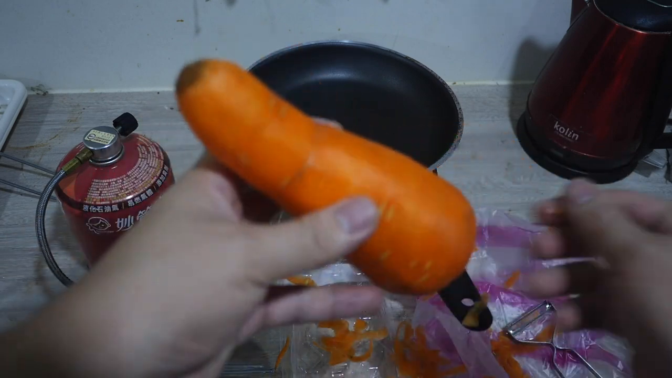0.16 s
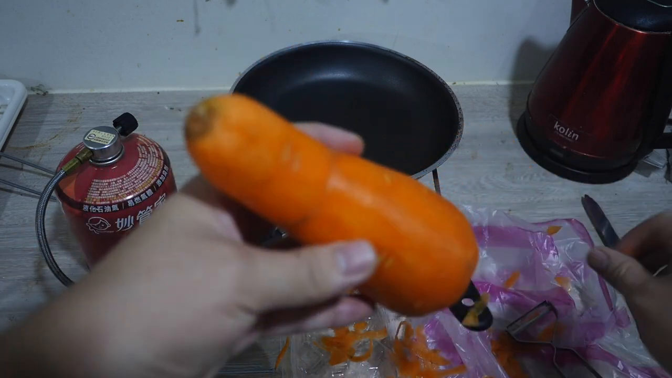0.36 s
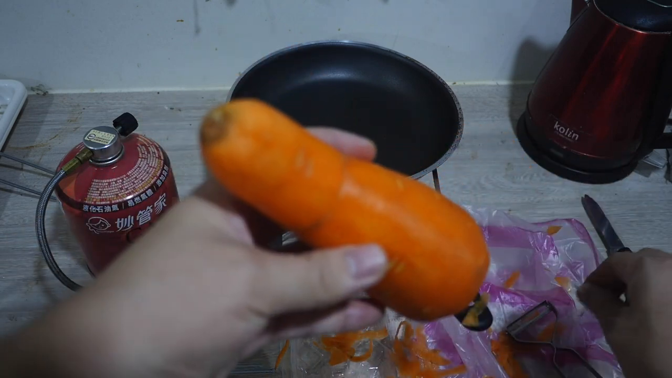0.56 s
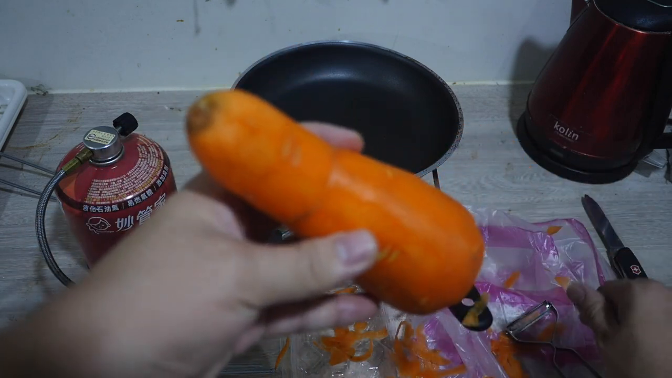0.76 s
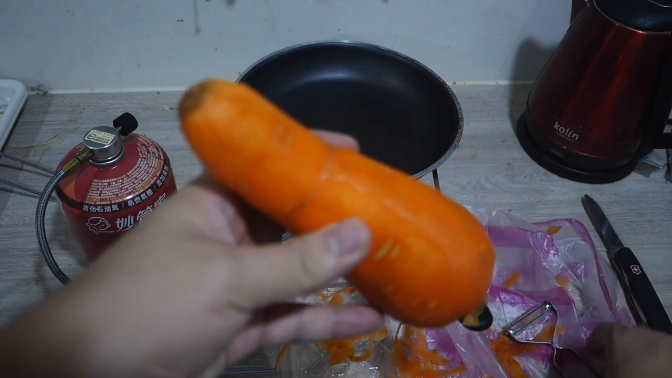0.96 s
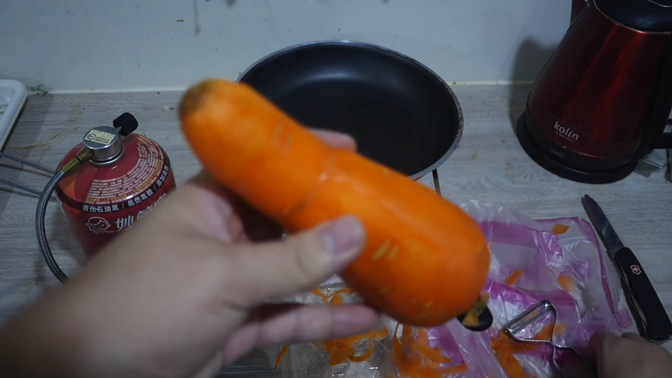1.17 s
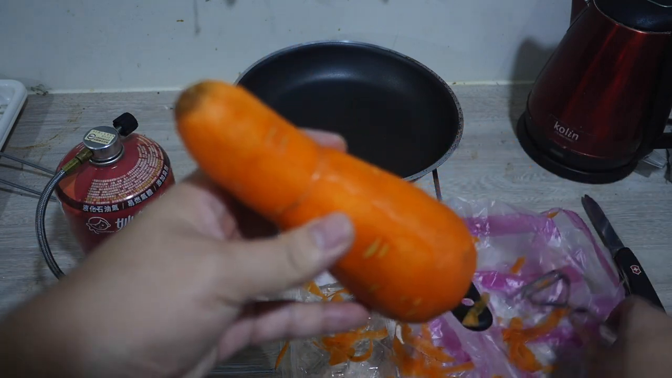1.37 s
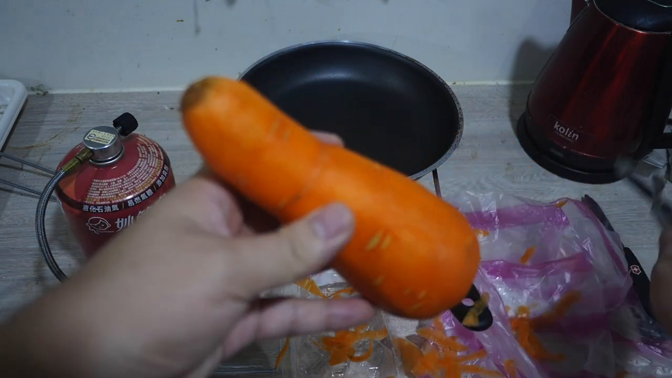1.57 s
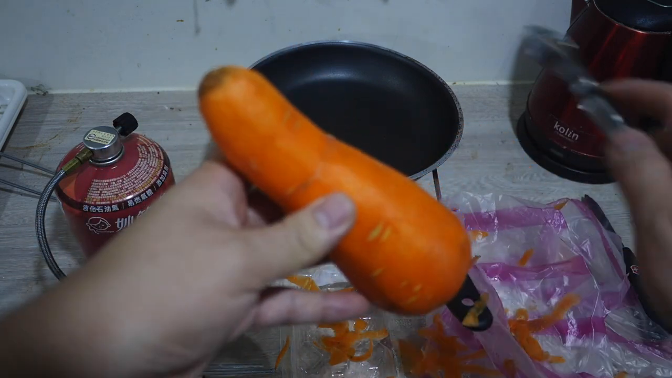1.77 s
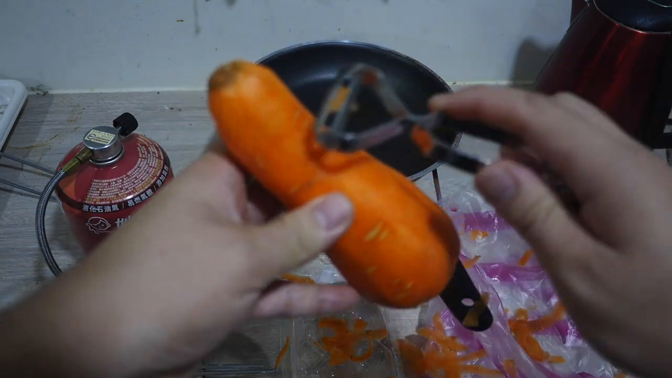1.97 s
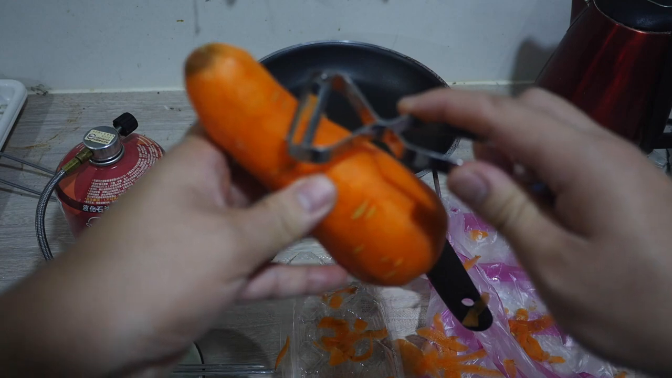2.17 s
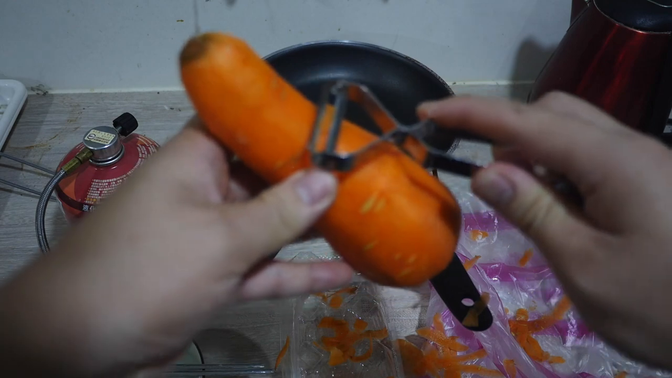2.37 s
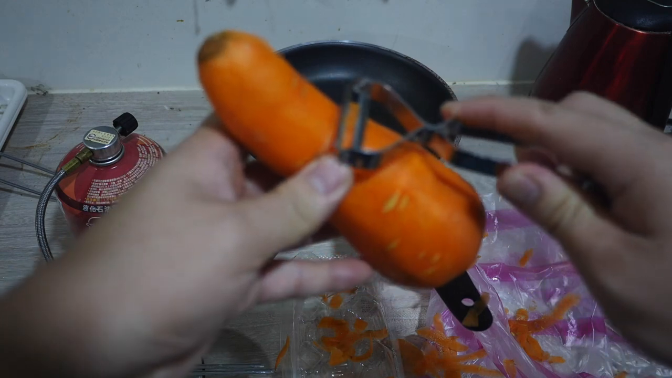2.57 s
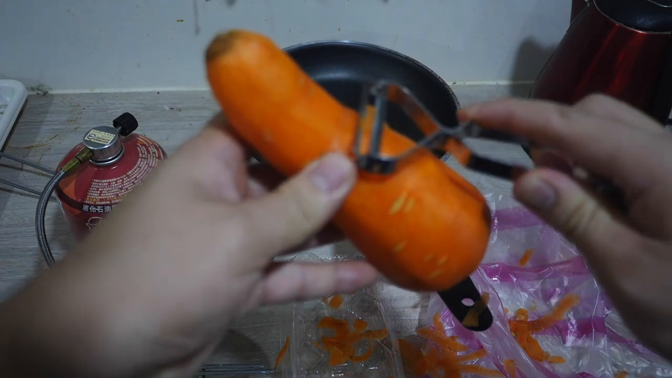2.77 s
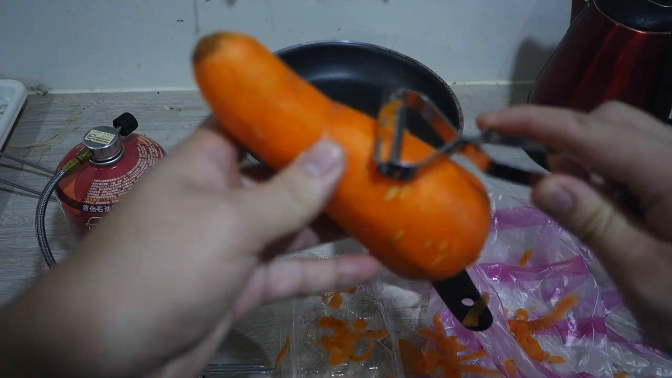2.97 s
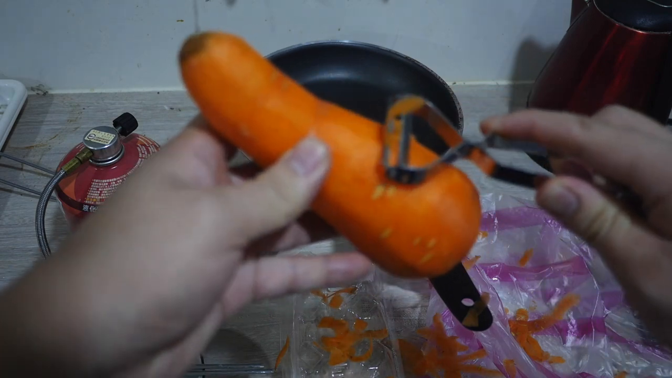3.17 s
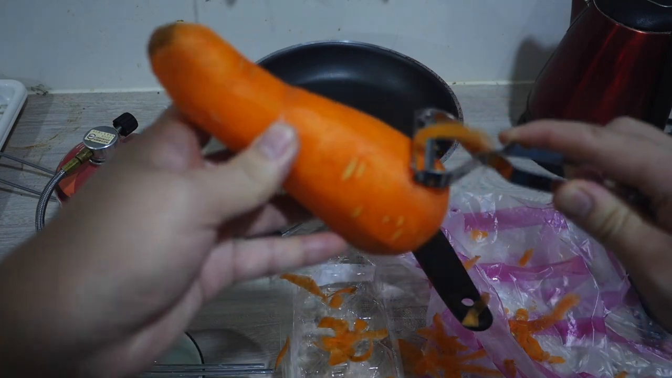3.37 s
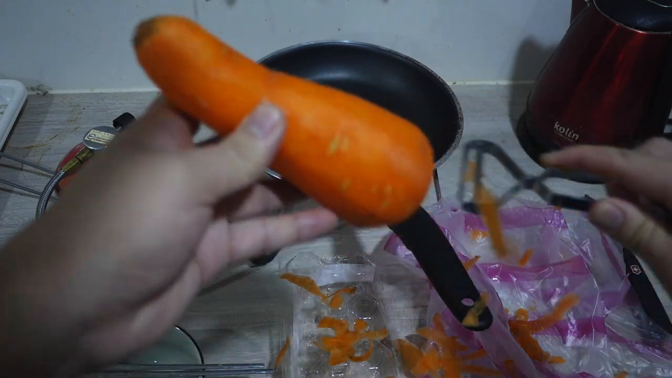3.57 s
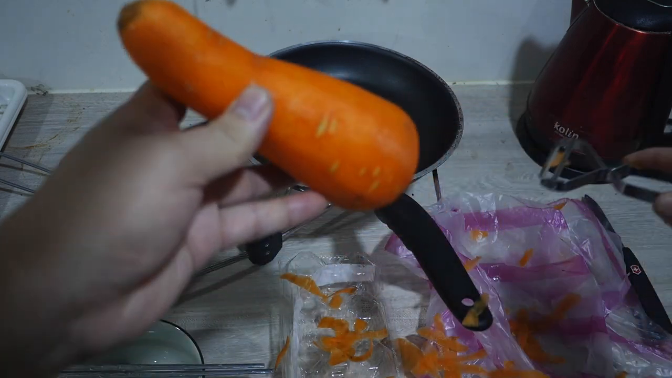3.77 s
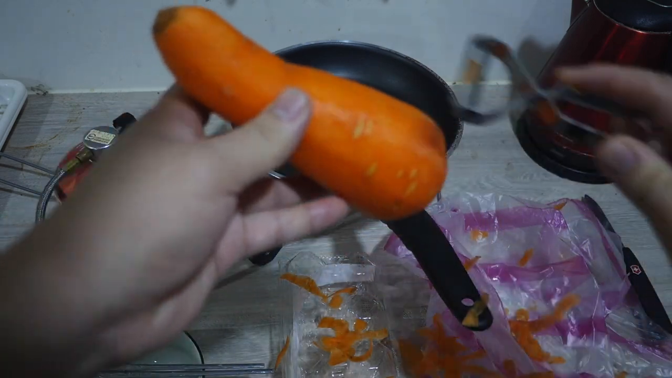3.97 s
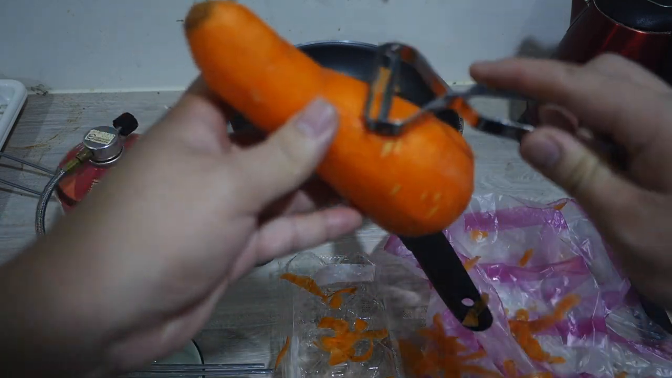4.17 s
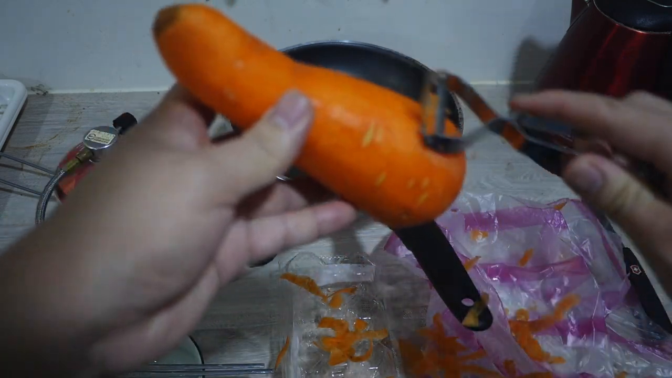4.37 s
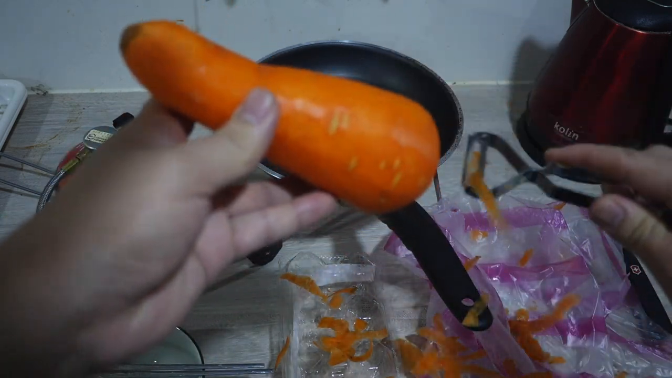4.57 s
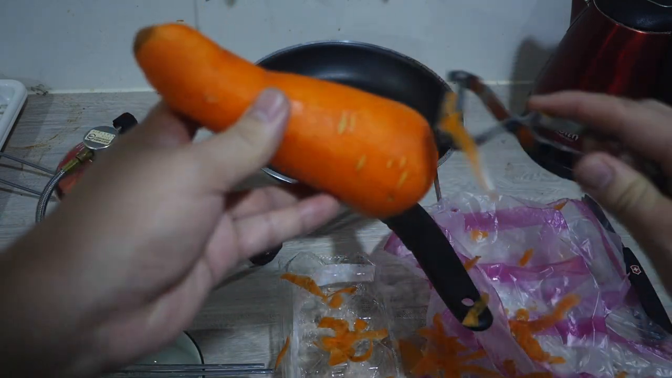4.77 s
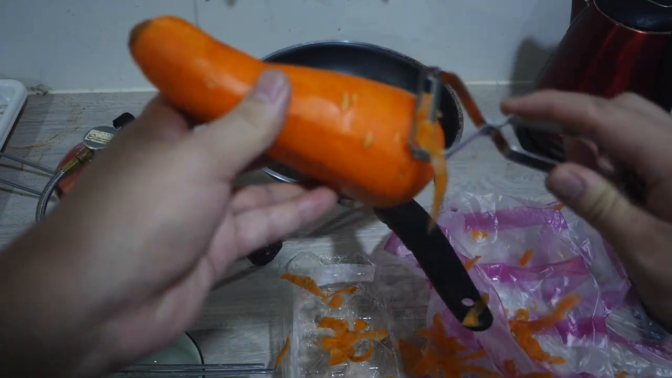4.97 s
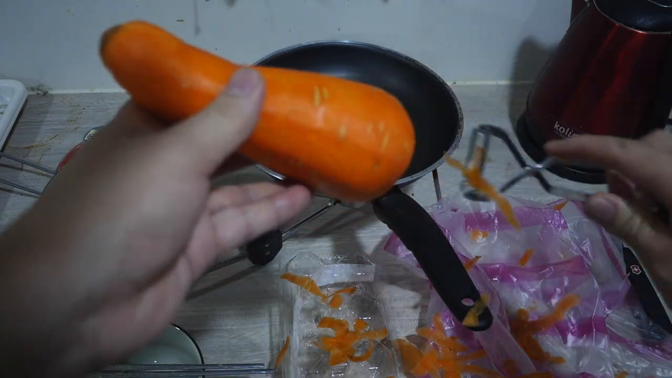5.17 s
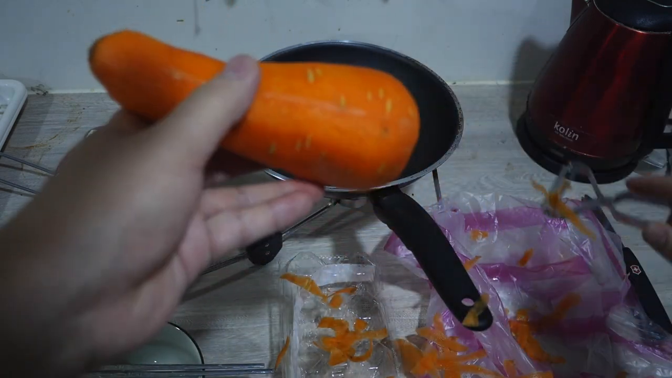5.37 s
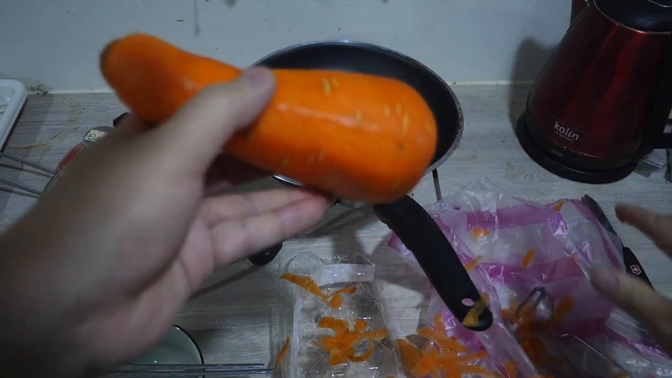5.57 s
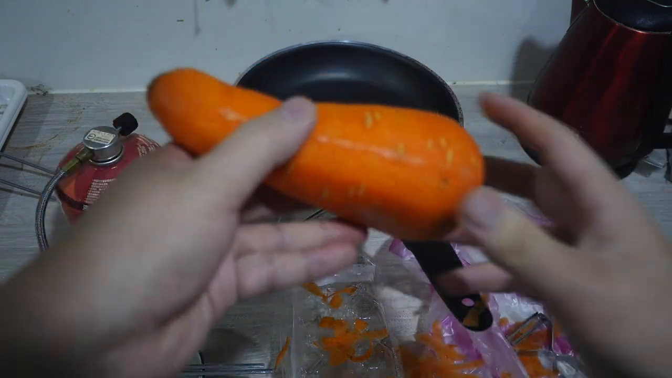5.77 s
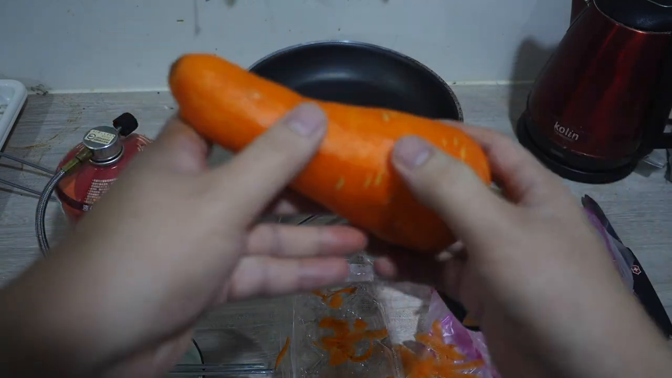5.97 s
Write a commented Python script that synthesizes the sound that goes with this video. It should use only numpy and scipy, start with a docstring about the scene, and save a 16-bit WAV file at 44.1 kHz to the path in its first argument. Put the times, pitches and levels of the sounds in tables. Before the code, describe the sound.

Over a faint fan hum, crinkling plastic gives way to thin raspy carrot peeling and steel clicks, ending in one hard, loud knock on the counter.

```python
"""Small hard kitchen, fan humming: a steel swivel peeler is lifted off a crinkly plastic bag, shaves a raw carrot in
six strokes and is dropped on the counter, where it knocks and skids.
Bag and carrot are filtered grit (uneven impulses over noise); the loose blade's clicks and jingles and the counter
are banks of modes; the skid is filtered noise; a decaying noise tail makes the reverberation."""
import sys
import numpy as np
from scipy import signal
from scipy.fft import rfft, irfft, next_fast_len
from scipy.io import wavfile
from scipy.ndimage import map_coordinates

SR = 44100
rng = np.random.default_rng(int(sys.argv[2]) if len(sys.argv) > 2 else 0)


def to_wav(sig):
    """Store sig (one row per channel, or 1-D mono) as 16-bit WAV at the path in sys.argv[1].

    Samples outside -1..1 are clipped; the rate is SR.
    """
    pcm = np.clip(np.atleast_2d(sig), -1, 1) * 32767
    pcm = np.round(pcm).astype(np.int16)
    wavfile.write(sys.argv[1], SR, pcm.T)  # frames by channels


N = 265041

# modes of the free blade: pitch_hz, mean_level_db, longest_t60_s
BLADE_MODES = [(2600, -9, .04), (2845, -11, .12), (3950, -15, .03), (5520, -8, .08), (5800, -5, .03),
               (6140, -11, .12), (7150, -4, .3), (7750, -15, .2), (10100, -7, .12), (11070, 0, .22),
               (11760, -6, .2), (13120, -8, .12), (14150, -4, .18), (14580, -2, .15)]


def amp(db):
    """Amplitude of a level in dB."""
    return 10 ** (np.asarray(db) / 20)


def unit(x):
    """x scaled to an RMS of 1."""
    return x / np.sqrt(np.mean(x ** 2) + 1e-20)


def along(points, hz):
    """Interpolate (Hz, value) points on a log frequency axis."""
    point_hz, values = np.transpose(points)
    return np.interp(np.log(hz + 1), np.log(point_hz + 1), values)


def wobble(knots_per_s):
    """A smooth random curve through normally distributed knots."""
    knots = rng.standard_normal(int(N * knots_per_s / SR) + 4)
    return map_coordinates(knots, [np.arange(N) * knots_per_s / SR])


def filtered(x, response):
    """x times a complex response of frequency."""
    size = next_fast_len(len(x) + 8192)
    spectrum = rfft(x, size) * response(np.fft.rfftfreq(size, 1 / SR))
    return irfft(spectrum, size)[:len(x)]


def resonances(peaks):
    """Causal response of (Hz, width Hz, dB) peaks, summed with alternating sign."""
    def response(f):
        return sum((-1) ** k * amp(db) * 1j * f * width / (centre ** 2 - f * f + 1j * f * width)
                   for k, (centre, width, db) in enumerate(peaks))
    return response


def grit(rate, spread_db, smooth):
    """Sparse impulses of very uneven size, rate per second, over a share of smooth noise."""
    struck = rng.random(N) < rate / SR
    size = amp(spread_db * np.minimum(rng.exponential(size=N), 3.5))
    hits = struck * size * rng.standard_normal(N)
    return unit(unit(hits) + smooth * rng.standard_normal(N))


def ring(modes, t60_s, scatter_db):
    """One blow: each mode at a new strength, its decay time capped at t60_s."""
    t = np.arange(SR // 5) / SR
    return sum(amp(db + rng.normal(0, scatter_db) - 60 * t / min(t60_s, life_s)) * np.sin(2 * np.pi * hz * t)
               for hz, db, life_s in modes)


def add(track, start_s, peak_db, sound):
    """Lay a sound into the track at start_s, its peak at peak_db."""
    part = track[round(start_s * SR):][:len(sound)]
    part += amp(peak_db) * sound[:len(part)] / np.abs(sound).max()


def swell(rows, rise_s, fall_s):
    """Gain of (start, end, dB, dB) gestures that rise and fall 30 dB in the given times."""
    t = np.arange(N) / SR
    return sum(amp(np.interp(t, [start - 3 * rise_s, start, end, end + 3 * fall_s],
                             [first - 90, first, last, last - 90]))
               for start, end, first, last, *_ in rows)


def kitchen(x):
    """Reverberation: a noise tail in which each frequency dies at its own speed."""
    # hz, t60_s
    decay = [(200, 0.98), (1000, 0.32), (4000, 0.61), (12000, 0.21)]
    hz, t, z = signal.stft(rng.standard_normal(SR // 2), SR, nperseg=256)
    fade = amp(-60 * t / along(decay, hz)[:, None])
    tail = signal.istft(z * fade, SR, nperseg=256)[1]
    delayed = np.pad(x, (150, 0))  # samples
    return signal.fftconvolve(delayed, tail / np.linalg.norm(tail))[:N]


def fan():
    """Broad room tone, and noise in narrow fan and duct resonances whose level wanders."""
    # room tone: hz, density_db_per_hz
    air_curve = [(30, -16), (180, -15), (700, -8), (1100, -6), (2230, -18), (2970, -21), (5130, -26),
                 (8000, -32), (15700, -35)]
    # fan and duct resonances, before the power below: hz, width_hz, level_db
    hum_peaks = [(50.7, 4.8, -8.5), (107, 8.3, -7), (263.1, 6.1, -4.5), (306.7, 22, 1), (390, 890, -10),
                 (518.3, 23.6, 1), (599.7, 7.3, -9), (1180, 20, -47)]
    air_db, hum_db = -67, -57.5
    air = unit(filtered(rng.standard_normal(N), lambda hz: amp(along(air_curve, hz))))
    hum = unit(filtered(rng.standard_normal(N), lambda hz: np.abs(resonances(hum_peaks)(hz)) ** 1.67))
    return amp(air_db) * air + amp(hum_db + 0.57 * wobble(4.1)) * hum


def bag():
    """Clumped crackle of the film, whose dull and bright folds come and go apart, with louder snaps on top."""
    # pushes on the bag: start_s, end_s, start_level_db, end_level_db
    pushes = [(1.068, 1.35, -43, -46), (1.375, 1.425, -40.5, -43), (1.44, 1.47, -47, -43.5),
              (1.495, 1.57, -35, -46.5), (1.62, 1.725, -52, -52), (2.3, 2.32, -62.5, -62.5),
              (3.845, 3.865, -58, -47.5)]
    # plastic film: hz, density_db_per_hz
    film = [(290, -22), (500, -5), (839, -7), (3790, -1), (4910, -6), (5590, -2.5), (15500, -16.5)]
    # single folds that snap: start_s, peak_db
    snaps = [(1.069, -39), (1.1545, -28), (1.285, -29), (1.3727, -28), (1.4894, -27.5), (1.6225, -39.5),
             (1.652, -30.5), (1.68, -33), (1.708, -33), (1.745, -44), (1.7763, -40.5), (1.8017, -35.5),
             (2.0286, -50), (2.0614, -41.5), (2.197, -47.5), (3.0104, -33), (3.8342, -44), (3.8465, -39.5)]
    rise_s, fall_s = .03, 0.024  # over 30 dB

    def crackle():
        return amp(2.4 * wobble(80)) * grit(rate=3600, spread_db=6.0, smooth=1.08)

    def bright(hz):
        return hz ** 2 / (hz ** 2 + 4500 ** 2)

    dull = filtered(crackle(), lambda hz: amp(along(film, hz)) * np.sqrt(1 - bright(hz)))
    crisp = filtered(crackle(), lambda hz: amp(along(film, hz)) * np.sqrt(bright(hz)))
    out = swell(pushes, rise_s, fall_s) * unit(dull + crisp)

    t = np.arange(SR // 20) / SR
    for start_s, peak_db in snaps:
        burst = amp(-60 * t / 0.03) * rng.standard_normal(len(t))
        add(out, start_s, peak_db, filtered(burst, resonances([(3680, 3300, 10.5), (9080, 9700, -7)])))
    return out


def drop():
    """Skid noise and blows on the counter; each contact favours its own pitch and weakens the modes above it."""
    # handle hits the counter: start_s, peak_db (before the last bass cut), contact_pitch_hz
    knocks = [(5.6251, -1, 5200), (5.6270, 5.5, 3440), (5.6435, -12, 790), (5.6598, -3.5, 1890),
              (5.6616, 3, 3000), (5.764, -12.5, 3400), (5.89, -37, 5000), (5.925, -42.5, 3400)]
    # counter modes: pitch_hz, mean_level_db, t60_s
    counter = [(490, -8.5, 0.027), (760, 0, 0.017), (1380, 3.5, 0.0032), (2030, -8.5, 0.0065),
               (2930, 1.5, 0.0032), (3810, 4, 0.0054), (5270, 1.5, 0.0089)]
    skid_s, skid_hold_s, skid_db, skid_sag_db = 5.622, 0.067, -22.5, 3
    skid_rise_s, skid_fall_s = 0.0058, 0.23  # over 30 dB

    def no_bass(hz):
        return (1j * hz / (250 + 1j * hz)) ** 3

    def scrape(hz):
        return resonances([(750, 700, 0), (2200, 2600, -4)])(hz) / (1 + (hz / 3500) ** 2)

    rough = amp(4.5 * wobble(90)) * rng.standard_normal(N)
    skid = unit(filtered(rough, lambda hz: scrape(hz) * no_bass(hz)))
    gesture = (skid_s, skid_s + skid_hold_s, skid_db, skid_db - skid_sag_db)
    out = swell([gesture], skid_rise_s, skid_fall_s) * skid

    for start_s, peak_db, contact_hz in knocks:
        board = ring(counter, t60_s=.1, scatter_db=4.5)
        board[0] += amp(-4)  # bare impact

        def contact(hz):
            return no_bass(hz) / (1 + .8j * hz / contact_hz - (hz / contact_hz) ** 2)

        add(out, start_s, peak_db, filtered(board, contact))
    return filtered(out, lambda hz: 1j * hz / (120 + 1j * hz))


def rattle():
    """Dense tiny contacts keep the free modes sounding in fits over their own hiss; long-lived modes build up most."""
    # jingling as the peeler is lifted and after bounces: start_s, end_s, start_level_db, end_level_db
    fits = [(1.862, 1.92, -40, -57), (5.623, 5.64, -22, -31), (5.66, 5.7, -32, -35.5),
            (5.76, 5.82, -37.5, -39)]
    rise_s, fall_s = .008, .1  # over 30 dB

    def contacts():
        return amp(3.7 * wobble(35)) * grit(rate=1700, spread_db=3.5, smooth=0.39)

    level = swell(fits, rise_s, fall_s)
    # t60 to bandwidth
    free = [(hz, np.log(1000) / np.pi / t60_s, db + 20 * np.log10(t60_s)) for hz, db, t60_s in BLADE_MODES]
    tones = sum(filtered(contacts(), resonances(free[k::4])) for k in range(4))
    hiss = filtered(grit(rate=6100, spread_db=11.5, smooth=1.2), resonances([(9000, 34000, 0)]))
    return level * (amp(-1.0) * unit(tones) + amp(-2) * unit(hiss))


def blade():
    """Each contact is a short chatter: a bare crack, the modes damped by the frame, then a weaker free ring."""
    # blade knocks in its frame: start_s, peak_db, chatter_s
    clicks = [(1.712, -37, 0.003), (1.823, -36, 0.017), (1.861, -42, 0.0023), (1.9, -34.5, 0.01),
              (2.114, -58, 0.0017), (2.1318, -18, 0.0028), (3.6137, -37, 0.004), (3.618, -30, 0.0063),
              (3.7, -59, 0.0017), (3.924, -48.5, 0.0061), (4.046, -39, 0.0064), (4.058, -34, 0.0099),
              (4.103, -55, 0.002), (4.139, -33.5, 0.0034), (4.206, -44, 0.009), (4.2372, -16, 0.0071),
              (4.569, -48.5, 0.0091), (4.574, -30.5, 0.0025), (4.582, -24.5, 0.0068), (4.598, -32, 0.0079),
              (4.798, -61, 0.0016), (4.867, -64, 0.003), (4.895, -50, 0.0074), (4.907, -36, 0.0086),
              (4.934, -40, 0.0044), (4.952, -18, 0.0061), (4.997, -37.5, 0.00075), (5.141, -42, 0.0033),
              (5.146, -28, 0.0075), (5.508, -46.5, 0.0038), (5.523, -49.5, 0.028)]
    # free ring at a 0 dB knock; harder knocks seat the blade and ring less
    free_db, grip_db_per_db = -56.5, 0.44
    out, t = np.zeros(N), np.arange(SR // 20) / SR
    for start_s, peak_db, chatter_s in clicks:
        noise = rng.standard_normal(len(t))
        fade = amp(-60 * (t - chatter_s) / 0.021)
        chatter = noise * np.where(t < chatter_s, 1.3 - 1.0 * t / chatter_s, fade)
        steel = ring(BLADE_MODES, t60_s=0.011, scatter_db=4)
        free_gain = amp(free_db - grip_db_per_db * peak_db)
        steel = steel + free_gain * ring(BLADE_MODES, t60_s=0.085, scatter_db=4)
        steel[0] += amp(16.0)  # bare crack
        bright_steel = filtered(steel, resonances([(8000, 8800, 0)]))
        add(out, start_s, peak_db, signal.fftconvolve(chatter, bright_steel))
    return out


def shaving():
    """Cells tear under the edge; a narrow blade resonance shifts between pitches, the damped blade colours the fizz."""
    # start_s, end_s, start_level_db, end_level_db, blade_hz, shift_s, shifted_blade_hz
    strokes = [(2.656, 2.815, -63, -60, 2600, 2.52, 2530), (2.981, 3.112, -48.5, -51.5, 2653, 3.1, 3930),
               (3.266, 3.42, -46.5, -52, 3940, 3.3, 3550), (3.532, 3.585, -50.5, -52.5, 2936, 3.7, 3330),
               (4.304, 4.55, -49, -50, 3930, 4.4, 2970), (4.988, 5.095, -55, -48.5, 2950, 5.05, 2850)]
    # tearing cells: hz, density_db_per_hz
    flesh = [(1200, -27), (2100, -10), (2600, -10), (4500, -7.5), (6500, -12), (8000, -34)]
    # blade damped by the carrot: hz, width_hz, level_db
    edge = [(8240, 270, -6.5), (11260, 350, 2.5), (11100, 13000, -11)]
    bite_s, lift_s = 0.056, 0.039  # over 30 dB
    fizz_db, fizz_gain_db = -7, 4.5  # as the edge bites; gain as the stroke speeds up
    half_shift_s = .02  # half the time of a pitch shift

    rows, t = np.array(strokes), np.arange(N) / SR
    start, end, shift = rows[:, 0], rows[:, 1], rows[:, 5]
    knots_s = np.ravel([start - half_shift_s, shift - half_shift_s,
                        shift + half_shift_s, end + half_shift_s], "F")
    blade_hz = np.interp(t, knots_s, rows[:, [4, 4, 6, 6]].ravel())
    progress = np.interp(t, rows[:, :2].ravel(), np.tile([0, 1], len(rows)))

    def tear():
        return amp(1.8 * wobble(40)) * grit(rate=6700, spread_db=6.0, smooth=0.83)

    body = unit(filtered(tear(), lambda hz: amp(along(flesh, hz))))
    slow_noise = unit(filtered(tear(), lambda hz: 1 / (1 + (hz / 270) ** 2)))
    narrow = slow_noise * np.sin(2 * np.pi * np.cumsum(blade_hz) / SR)
    frame = amp(5.9 * wobble(6.9)) * unit(filtered(tear(), resonances([(2780, 210, -2.5), (5780, 800, 0)])))
    treble = unit(filtered(tear(), lambda hz: resonances(edge)(hz) * (hz > 6500)))
    fizz = amp(fizz_db + fizz_gain_db * progress) * treble
    mix = amp(-5) * body + amp(-1.5) * narrow + amp(-8) * frame + fizz
    return swell(strokes, bite_s, lift_s) * mix


def scene():
    """Each source dry plus its share of reverberation: least for the peeler in the hands, most for the bag."""
    near = shaving() + blade() + rattle()
    below = bag()
    thud = drop()
    wet = kitchen(amp(-17.5) * near + amp(-10.5) * below + amp(-15.5) * thud)
    return (near + below + thud + wet + fan())[None]


def record(dry):
    """The converter clips at full scale; deep bass is rolled off and nothing is kept above the band limit."""
    bass_hz, top_hz = 40, 15800
    clipped = np.clip(dry[0], -1, 1)
    return filtered(clipped, lambda hz: 1j * hz / (bass_hz + 1j * hz) * (hz < top_hz))[None]


dry = scene()
out = record(dry)
to_wav(out)
```